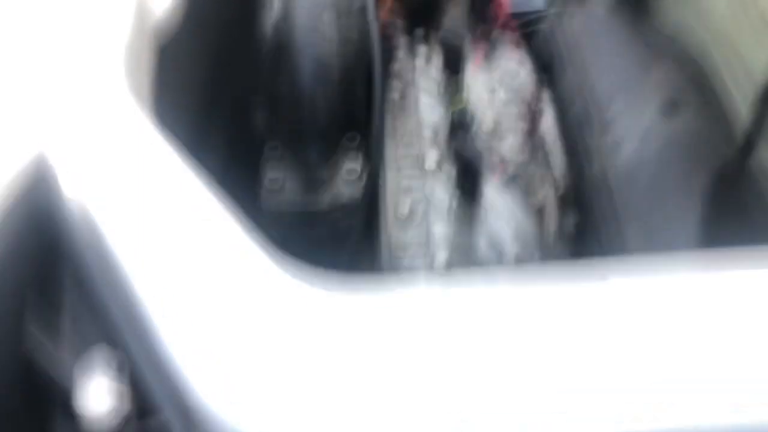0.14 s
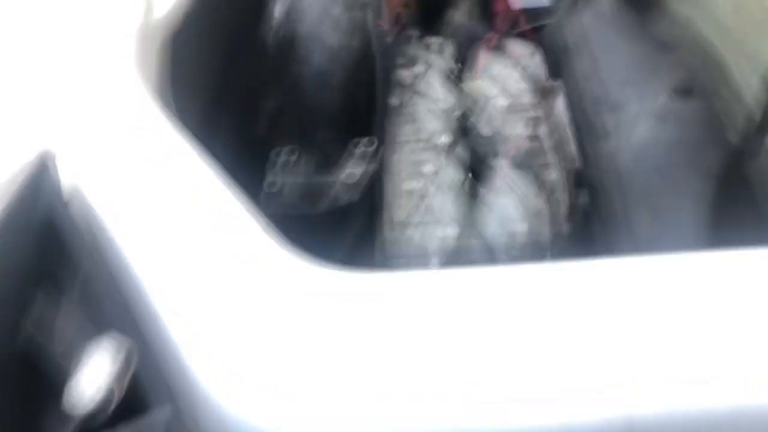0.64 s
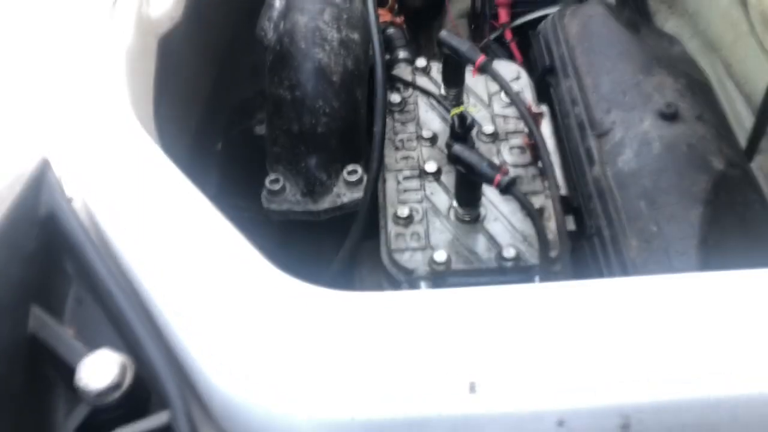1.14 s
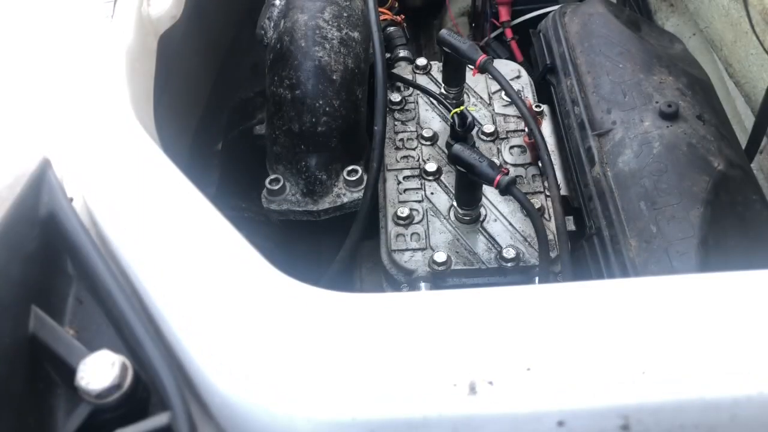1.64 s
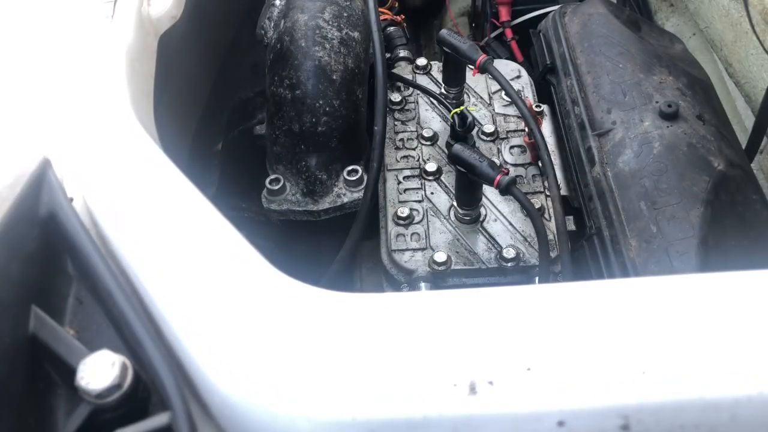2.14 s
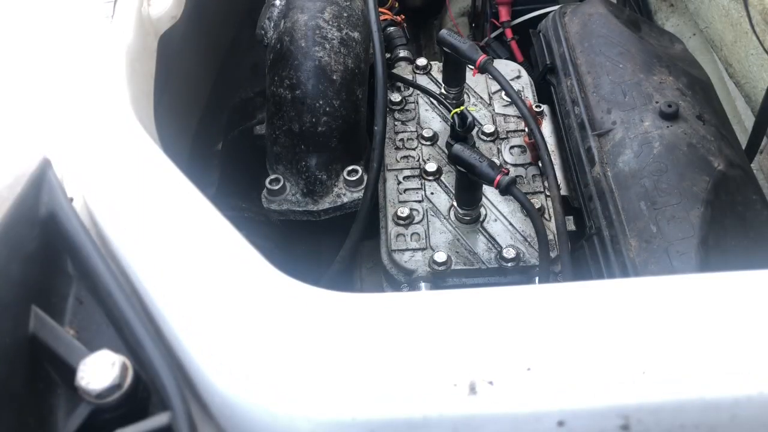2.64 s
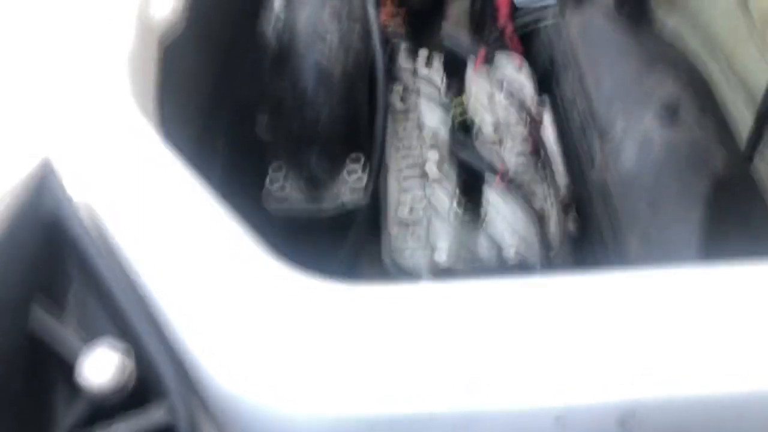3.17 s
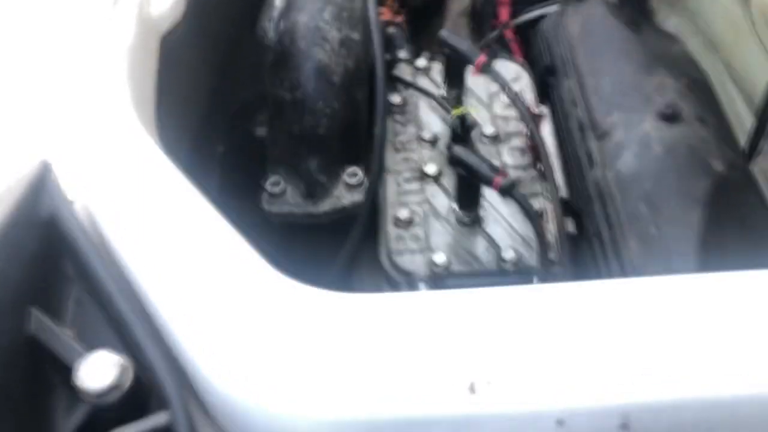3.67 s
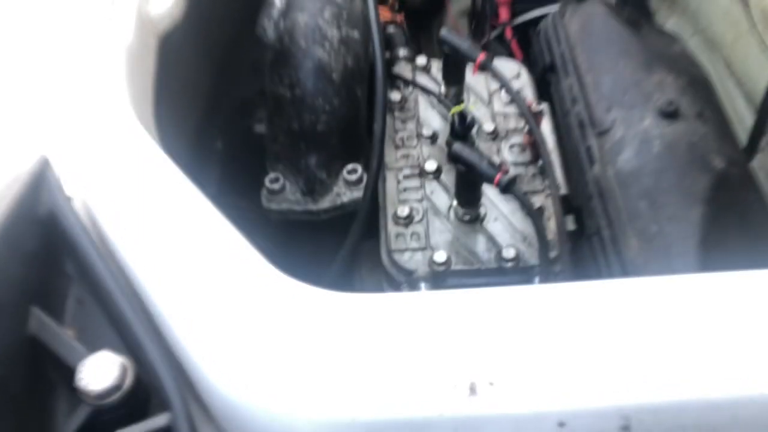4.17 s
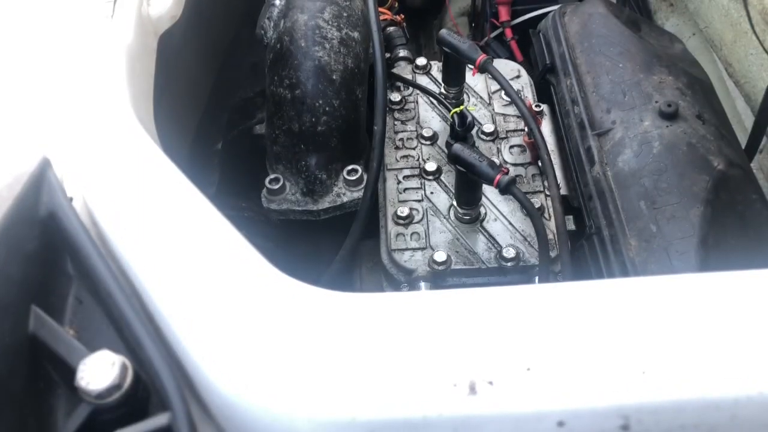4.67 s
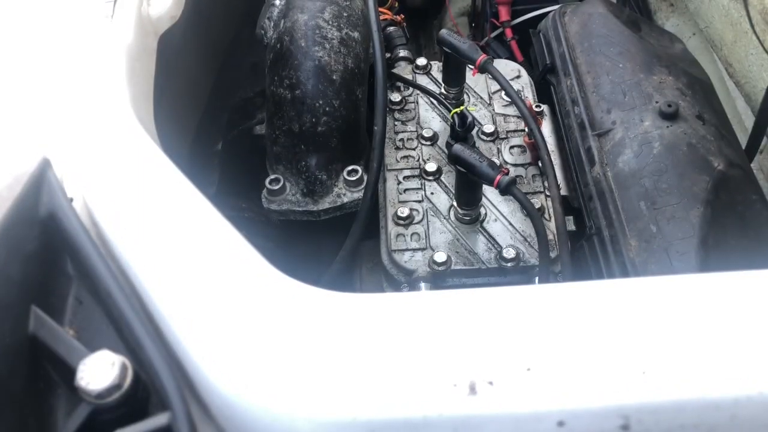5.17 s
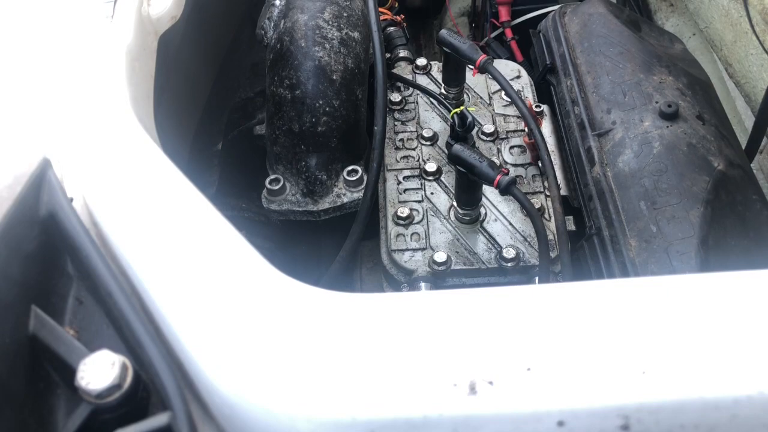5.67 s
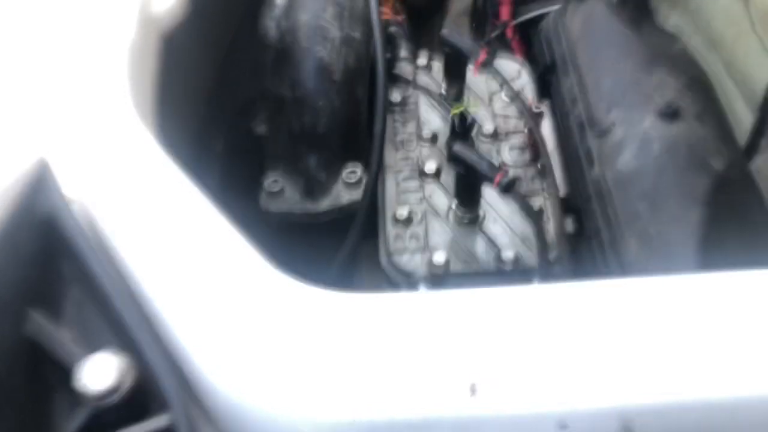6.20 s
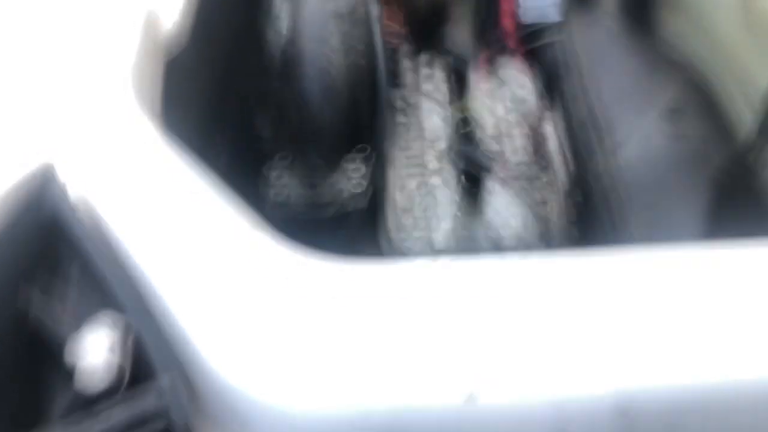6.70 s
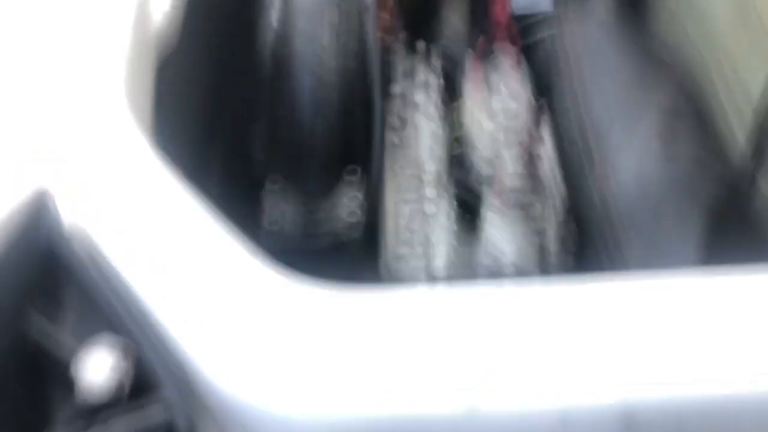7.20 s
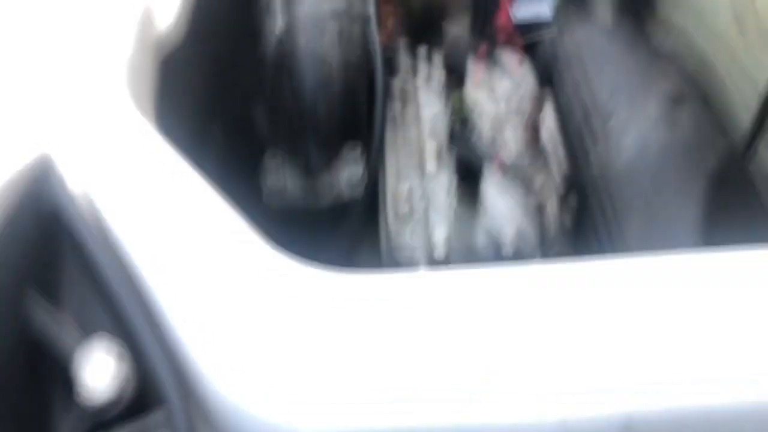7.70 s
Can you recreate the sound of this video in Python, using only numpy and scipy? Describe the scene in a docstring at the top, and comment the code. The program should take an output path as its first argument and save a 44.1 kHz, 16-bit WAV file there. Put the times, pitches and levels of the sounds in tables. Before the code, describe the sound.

A phone-like microphone just over the engine bay hears a two-cylinder engine buzzing unevenly, slowing into hissing, metallic rattles and stopping. After calm air and low wind thumps, the starter bites with a loud double clack and churns in rhythmic pulses, stops, snaps in again for a moment, then spins down. Small ticks, thin hiss and a barely audible bird fill the gap before a final, stronger crank. Short hollow hull echo throughout.

```python
"""Rough two-stroke and a starter in vain

A two-cylinder two-stroke in an open hull, heard by a phone held just above it, runs rough and dies; the starter
then cranks it three times in vain. Each layer is noise or tone timed by the crank angle and rung through resonances:
throb in the hull, gear rattle, port hiss twice a turn. Solenoid and pinion clack as filtered noise bursts.
Around them: ticks, wind bumps, breathy swells of noise, a faint hiss, a far bird's near-sine notes and open air."""
import sys
import numpy as np
from scipy import signal
from scipy.fft import rfft, irfft
from scipy.io import wavfile
from scipy.ndimage import uniform_filter1d

SR = 44100
rng = np.random.default_rng(int(sys.argv[2]) if len(sys.argv) > 2 else 0)


def persist_wave(psi):
    """Save psi, clipped to +-1, as 16-bit WAV."""
    counts = np.round(np.clip(psi, -1, 1) * 32767).astype(np.int16)
    wavfile.write(sys.argv[1], SR, np.atleast_2d(counts).T)


def gain_from_decibels(decibels):
    """Convert decibel values to linear amplitude factors."""
    exponent = np.asarray(decibels, float) / 20
    return 10 ** exponent


N = 345303
T = np.arange(N) / SR

# quiet open air, spectrum: hz, density_db_per_hz
AIR_SPECTRUM = [(30, -6), (70, -1), (200, 0), (300, -4), (480, -14), (1500, -26), (2200, -33), (4000, -40),
                (16000, -54)]
AIR_DB = -50.5
# the far bird's thin notes on one pitch: centre_s, half_length_s, level_db
BIRD_NOTES = [(5.714, .045, -66), (5.797, 0.013, -60), (5.89, .03, -82), (5.98, .035, -78.5)]
BIRD_HZ = 4510
# its falling note: time_s, pitch_hz, level_db
BIRD_FALL = [(5.945, 3770, -83), (5.97, 3500, -76.5), (6.01, 3240, -73), (6.05, 3100, -67)]
# wind bumps on the microphone: start_s, level_db, pitch_hz
WIND_BUMPS = [(1.689, -46, 156), (1.834, -36, 127), (2.132, -40, 74.5), (2.179, -40, 45.8),
              (2.233, -34, 62.3), (2.319, -39.5, 70.4), (2.359, -44.5, 42.6), (2.459, -46, 57),
              (5.776, -42, 78)]
# soft breathy swells of noise: rustles, and the last high hiss as the starter coasts:
# centre_s, half_length_s, level_db, centre_hz
BREATHY_SWELLS = [(1.678, 0.0065, -66, 2470), (1.832, 0.0173, -72.5, 10900), (2.03, 0.051, -71.5, 6920),
                  (2.267, 0.02, -68, 3600), (2.308, 0.15, -69, 1700), (4.422, .13, -67, 8970),
                  (4.712, 0.044, -72, 10000), (5.021, 0.04, -72, 9100), (5.271, .05, -73, 9000)]
# a faint hiss, perhaps gas seeping from a cylinder, resonances: hz, width_hz, gain_db
SEEP_MODES = [(2884, 130, 5), (4570, 493, -4.5), (5500, 900, -9.5), (8000, 2800, -21)]
SEEP_S, SEEP_HOLD_S, SEEP_DB, SEEP_FALL_DB_S = 4.83, 0.3, -67, 22
# small ticks round the hull: start_s, peak_db, crack_hz, t60_s, crankcase_share_db
TICKS = [(.998, -28, 8000, 0.013, -20), (1.023, -36, 9000, 0.015, -23), (1.149, -40, 4000, .05, 4),
         (1.194, -37, 1000, 0.035, 16), (4.658, -39, 2160, 0.033, 3), (4.868, -30.5, 2090, 0.076, 7.5),
         (5.172, -44, 3100, 0.026, -10), (5.203, -54, 6050, .02, -6), (5.234, -47, 3280, 0.052, 9)]
# solenoid and pinion: start_s, peak_db, crack_hz, t60_s, crankcase_share_db
CLACKS = [(2.7205, -9.5, 2440, 0.18, 0.5), (2.743, -0.5, 3950, 0.13, 3.5), (3.658, -0.5, 1908, 0.09, -11),
          (3.8395, -8, 2370, 0.2, 2), (3.858, -0.5, 3630, 0.17, 8), (3.884, -18, 1947, 0.034, -9),
          (3.972, -14.5, 2200, 0.2, 5.5), (4.134, -2, 2640, 0.097, 0), (4.15, -11, 1900, .05, 4.5),
          (4.188, -20, 1276, 0.15, 7), (4.21, -28, 1960, 0.084, 4.5), (6.054, -8.5, 2460, 0.23, -1.5),
          (6.075, 1.5, 3780, 0.024, 4), (7.714, 0, 2770, 0.08, -1)]
BRIGHTER_DB_PER_DB = 2.24  # harder blows carry more treble
# sliding tones as the freed starter and the crank come to rest:
# centre_s, half_length_s, pitch_hz, slide_hz_per_s, level_db
REST_SLIDES = [(4.37, .06, 720, -1500, -46), (4.77, .02, 2050, -2500, -58), (4.845, .02, 3100, -5000, -59)]
# the starter whines as it first takes the load: centre_s, half_length_s, base_hz, level_db
STARTER_WHINES = [(2.887, .028, 570, -35), (6.217, 0.02, 590, -31)]

# one curve per spell of turning: time_s, shaft_turns_hz, hull_throb_db, drive_db (0 = full drive)
SPELLS = [
    [(0.0, 35.53, -15, -0.5), (0.5, 36.11, -16, -0.5), (0.634, 32.56, -17.5, -2), (0.722, 30.23, -15.5, -3),
     (0.78, 29.62, -23, -6), (0.944, 30.73, -24, -11.5), (1.052, 28.1, -26.5, -13.5),
     (1.164, 25.4, -37.5, -22), (1.278, 25.4, -41.5, -38), (1.5, 23.37, -57, -48)],
    [(2.75, 13.5, -34, -16.5), (2.804, 16, -32.5, -12), (2.97, 16, -20.5, -0.5), (3.15, 17.4, -21.5, -0.5),
     (3.458, 17.6, -23, 0), (3.682, 17.8, -21, 0.2), (3.74, 16, -26, -18), (3.838, 16.8, -27.5, -16)],
    [(3.865, 62, -37.5, -6.5), (3.913, 17.5, -27, -12.5), (4.121, 18, -24.5, -12), (4.177, 21, -42.5, -24),
     (4.23, 16, -41.5, -28), (4.417, 21, -55, -32.5), (4.6, 16, -51, -44), (4.85, 14.0, -54, -53)],
    [(6.08, 12.7, -23, -12), (6.152, 17.5, -27.5, -9), (6.284, 17.3, -17, -1), (6.46, 18.1, -17, -1.1),
     (6.668, 18.6, -14, 0), (7.258, 18.35, -14, 0.5), (7.604, 18.4, -14, 0.4), (7.732, 18, -16, -0.8),
     (7.756, 18.1, -16, -6), (7.83, 12, -32, -15)],
]
# per spell: time of one strong port puff puff_s, throb's swell per turn 0-1, puff depth 0-1
MANNER = [(.205, 0.03, 0.6), (3.305, 0.75, 0.98), (3.97, .3, 0.7), (7.207, 0.2, 0.87)]
# per spell: pure share of the throb 0-1, stroke scatter_db, pinion thrown out out_s (negative = no starter)
EVENNESS = [(.05, 4, -1), (.85, 1.5, 3.659), (.1, 4, 4.134), (.91, 1.2, 7.714)]
# exhaust growl, crankcase, metal rattle, port hiss follow the drive: full_drive_db, slope_db_per_db
RUNNING_LAW = [(-16.5, 1.32), (-15.5, 1.76), (-27, 1.45), (-28.5, 1.72)]
CRANKING_LAW = [(-25, 0.95), (-19, 1), (-25, 0.85), (-28, 1.05)]  # same rows and columns with the starter turning it
# the pinion biting jolts the same four layers: peak_db, fall_db_per_s
JOLT = [(-16.5, 109.5), (-15, 145.5), (-16, 334.5), (-21, 423.5)]
# per spell: strength_db of the jolt at its start, and when the pinion is thrown out
BITE_DB = [-70, -1, -2, 2]
THROW_DB = [-60, -10.5, -12.5, -12]
# short surges: they lift the hiss, and the rattle where the gears run free;
# growl and crankcase too while the engine runs: centre_s, hiss_boost_db
SURGES = [(.05, 10), (0.223, 9), (.355, 4.5), (.53, 5.5), (0.661, 6.5), (.76, 11), (.825, 9.5),
          (.885, 11.5), (1.0, 10.5), (1.085, 4), (1.15, 5.5), (1.2, 6.5), (3.97, 7), (4.085, 4),
          (4.203, 5.5)]
# running engine's firing orders: shaft_order, level_db
FIRING_ORDERS = [(1, -11), (2, -1), (3, 0), (4, -9), (6, -3), (9, -6)]
# hull resonances: hz, width_hz, gain_db
HULL_MODES = [(55, 3.9, 4.5), (73, 11, -2.1), (97, 42, -6)]
# exhaust resonances: hz, width_hz, gain_db
PIPE_MODES = [(149, 42, -5), (223.7, 12, 2.2), (244.5, 26, -5), (323.7, 28, -0.5), (376.2, 31, 1),
              (417, 144, -6)]
# crankcase resonances: hz, width_hz, gain_db
CASE_MODES = [(497.4, 60, -4.5), (580, 70, -1), (645, 36, 5), (695, 35, 2), (812, 52, -6), (877, 28, -0.5),
              (940, 40, -2.5)]
# gear rattle, spectrum: hz, density_db_per_hz
RATTLE_SPECTRUM = [(600, -35), (1050, 1.5), (1420, -7), (1560, -13.5), (1750, -5.5), (2600, 0),
                   (3950, -3.5), (4150, -14), (6000, -32.5), (9000, -56.5)]
# pinion in the ring gear, resonances: hz, width_hz, gain_db
MESH_MODES = [(1300, 88, 0.5), (1430, 21, 9.5), (1702, 40, 5), (1890, 43, 8), (2156, 18, 3.5),
              (2346, 40, 0.5), (2550, 47, 2.5), (2997, 15, 2.5), (3400, 45, 6), (3780, 41, -5.5),
              (3950, 19, -4.5), (4190, 18, -8.5)]
# free flywheel and casting, resonances: hz, width_hz, gain_db
CASTING_MODES = [(1190, 60, -11), (1690, 40, -8), (1885, 38, 3), (2190, 50, -9), (2575, 40, -3),
                 (2820, 60, -4), (3010, 45, -3), (3900, 80, -11), (4950, 110, -19), (5820, 70, -18),
                 (6360, 60, -16), (7760, 100, -17), (8980, 110, -19), (9700, 150, -23), (11600, 150, -22),
                 (12280, 70, -19), (14100, 90, -22), (14440, 90, -21)]
CHIME_RUNNING_DB, CHIME_COASTING_DB = 6.5, -9.5  # ring of the casting once nothing drives the ring gear
# port hiss, spectrum: hz, density_db_per_hz
HISS_SPECTRUM = [(2350, -4.5), (4000, -3), (5390, -4.5), (6280, -1.5), (7100, -2.5), (9180, -2.5),
                 (12500, -7.5), (16200, -5)]
COAST_HISS_DB = -2.5  # the freed starter spins on and hisses


def level(x, db):
    """Set the rms."""
    return x * gain_from_decibels(db) / np.sqrt(np.mean(x ** 2))


def colour(x, points):
    """Causal filter through (Hz, dB) points, from the folded cepstrum of the log gain."""
    hz, db = np.transpose(points)
    grid = np.fft.rfftfreq(4096, 1 / SR)
    cepstrum = irfft(np.interp(np.log(grid + 1), np.log(hz), db) * np.log(10) / 20)
    cepstrum[1:2048] *= 2
    cepstrum[2049:] = 0
    response = irfft(np.exp(rfft(cepstrum)))
    return signal.fftconvolve(x, response)[:len(x)]


def ring(x, modes):
    """Sum of two-pole resonances with alternating sign."""
    out = 0
    for k, (hz, width, db) in enumerate(modes):
        out = out + (-1) ** k * gain_from_decibels(db) * signal.lfilter(*signal.iirpeak(hz, hz / width, SR), x)
    return out


def walk(rate):
    """Random levels held 1 / rate s and slewed twice; spread near 1."""
    k = int(SR / rate)
    held = np.repeat(rng.standard_normal(N // k + 1), k)
    return 1.3 * uniform_filter1d(uniform_filter1d(held, k), k)[:N]


def waver(spread_db, rate, n=N):
    """Gain that wanders at random by about spread_db."""
    return gain_from_decibels(spread_db * walk(rate)[:n])


def shimmer(shape, modes, flicker_db):
    """Resonances on unrelated noises; each swells and fades on its own."""
    n = len(shape)
    return sum(ring(shape * rng.standard_normal(n) * waver(flicker_db, 22, n), [mode]) for mode in modes)


def bell(centre_s, half_s):
    """Smooth swell, down to 1/e at half_s either side of its centre."""
    return np.exp(-((T - centre_s) / half_s) ** 2)


def air():
    """Quiet open air: noise whose bass is gusty while the rest drifts slowly."""
    gusty = colour(rng.standard_normal(N) * waver(1.2, 16), AIR_SPECTRUM)
    drifting = colour(rng.standard_normal(N) * waver(0.71, 2.6), AIR_SPECTRUM)
    split = signal.butter(2, 320, fs=SR)
    # gusty below the split, drifting above it
    return level(signal.filtfilt(*split, gusty - drifting) + drifting, AIR_DB)


def bird():
    """Thin whistles, near sines: swelling notes on one pitch, then a falling one."""
    notes = sum(gain_from_decibels(db) * bell(s, half) for s, half, db in BIRD_NOTES)
    s, hz, db = np.transpose(BIRD_FALL)
    phase = 2 * np.pi * np.cumsum(np.interp(T, s, hz)) / SR
    falling = np.sin(phase) * gain_from_decibels(np.interp(T, s, db, -140, -140))
    return np.sqrt(2) * (notes * np.sin(2 * np.pi * BIRD_HZ * T) + falling)


def bumps():
    """A gust presses the microphone: a cycle or two of low pressure."""
    out, t = np.zeros(N), T[:SR // 8]
    for s, db, hz in WIND_BUMPS:
        press = np.sin(2 * np.pi * hz * t) * np.exp(-t * hz / 0.79)
        out[int(s * SR):][:len(t)] += gain_from_decibels(db) * 2.35 * press
    return out


def breathy_swells():
    """Short swells of grainy, broad noise."""
    out, t = np.zeros(N), T[:SR // 2]
    middle = t.mean()
    for s, half, db, hz in BREATHY_SWELLS:
        grain = colour(rng.standard_normal(len(t)), [(hz / 3.6, -18), (hz, 0), (hz * 3.3, -16)])
        swell = np.exp(-((t - middle) / half) ** 2)
        out[int((s - middle) * SR):][:len(t)] += level(grain, db) * swell
    return out


def seep():
    """Resonant noise that starts at once, holds and fades."""
    onset = np.clip((T - SEEP_S) / 0.012, 0, 1)
    fade = gain_from_decibels(-SEEP_FALL_DB_S * np.maximum(T - SEEP_S - SEEP_HOLD_S, 0))
    return onset * fade * level(ring(rng.standard_normal(N) * waver(0.98, 36), SEEP_MODES), SEEP_DB)


def blows(rows, ring_db, top_db, spread):
    """A sharp crack, then a burst of chatter that rings casting and crankcase."""
    out, t = np.zeros(N), T[:SR // 3]
    for s, db, hz, t60, case_db in rows:
        fall = np.exp(-np.log(1000) * t / max(t60, .01))
        burst = rng.standard_normal(len(t)) * fall * np.minimum(t / 0.0014, 1)
        treble_db = top_db + BRIGHTER_DB_PER_DB * db
        skirt_hz = min(hz * spread ** 2, 15000)
        crack = colour(burst * fall, [(300, -25), (hz / spread, -8), (hz, 0), (skirt_hz, -10), (16000, treble_db)])
        casting = level(ring(burst, CASTING_MODES[:-5]), ring_db)
        crankcase = level(ring(burst, CASE_MODES + PIPE_MODES[-3:]), case_db)
        hit = level(crack, 0) + casting + crankcase
        out[int(s * SR):][:len(t)] += (hit * gain_from_decibels(db) / np.abs(hit).max())[:N - int(s * SR)]
    return out


def slides():
    """Short rough tones that sag in pitch."""
    out = 0
    for s, half, hz, slide, db in REST_SLIDES:
        pitch = (hz + slide * np.clip(T - s, -3 * half, 3 * half)) * (1 + .02 * walk(300))
        tone = np.sin(2 * np.pi * np.cumsum(pitch) / SR)
        out = out + gain_from_decibels(db) * waver(3.5, 90) * bell(s, half) * tone
    return out


def whine():
    """Three rough overtones of the armature, sliding up as it gathers speed."""
    out = 0
    for s, half, hz, db in STARTER_WHINES:
        slide = 1 + np.clip(T - s, -.1, .1) + 0.019 * walk(150)
        phase = 2 * np.pi * np.cumsum(hz * slide) / SR
        tones = sum(gain_from_decibels(-2.9 * (k - 4)) * waver(4.6, 90) * np.sin(k * phase) for k in range(2, 5))
        out = out + gain_from_decibels(db) * bell(s, half) * tones
    return out


def drive_levels(t, drive_db, law, jolts):
    """Levels in dB of growl, crankcase, rattle and hiss: each follows the drive, and dying jolts add their power."""
    out = []
    for (full_db, slope), (peak_db, fall) in zip(law, JOLT):
        power = gain_from_decibels(full_db + slope * drive_db) ** 2
        for at, db in jolts:
            power = power + (t >= at) * gain_from_decibels(peak_db + db - fall * np.abs(t - at)) ** 2
        out.append(10 * np.log10(power))
    return out


def port_puffs(angle, strong_luck, weak_luck, depth):
    """The ports open quickly twice a turn, the weaker a third of a turn ahead of the stronger."""
    strong = gain_from_decibels(.9 * strong_luck) * np.exp(-angle / .42)
    weak = gain_from_decibels(1.5 * weak_luck - 1.2) * np.exp(-((angle - .67) % 1) / .35)
    return uniform_filter1d(depth * np.maximum(strong, weak) + (1 - depth) * .7, SR // 250)


def cranked_throb(a, strokes, noise, swell, pure):
    """The fourth order sits on the hull resonance; the crank slowing at compression bends and swells it."""
    tone = (1 + swell * np.cos(a + 1.2)) * np.sin(4 * a + (.5 + .25 * swell) * np.sin(a + .4))
    knock = level(ring(strokes + 0.99 * noise, HULL_MODES), 0)
    return np.sqrt(pure) * level(tone, 0) + np.sqrt(1 - pure) * knock


def running_throb(a, noise):
    """The engine's own firing orders waver over the hull noise."""
    orders = sum(gain_from_decibels(db) * waver(4, 21.56, len(a)) * np.sin(k * a + k ** 2) for k, db in FIRING_ORDERS)
    # every second turn fires harder
    orders = orders * (1 + .7 * np.cos(a / 2 - 3.9))
    return level(level(orders, 1.1) + level(ring(noise, HULL_MODES[1:]), -0.31), 0)


def exhaust_growl(strokes, puffs, noise, pure):
    """Dull stroke thuds and puffing noise ring the exhaust."""
    thuds = colour(strokes, [(60, -12), (130, 0), (210, -2), (300, -14)])
    return ring(pure * thuds + noise * puffs ** 0.67, PIPE_MODES)


def crankcase(puffs, running):
    """Noise that follows the puffs weakly rings the crankcase."""
    case = shimmer(puffs ** .25 * waver(1.5, 150, len(puffs)), CASE_MODES, 1.5)
    if running:  # with the engine running by itself the upper pair is weaker
        case = colour(case, [(700, -1), (900, -6), (1100, -2)])
    return case


def gear_rattle(puffs, noise, slack_knock, free, surge):
    """Dense uneven blows, harder under each stroke; the spectrum alters once the pinion is out."""
    teeth = noise * waver(2.8, 500, len(puffs)) * puffs ** .5 * slack_knock
    meshed = level(colour(teeth, RATTLE_SPECTRUM), -4) + level(ring(teeth, MESH_MODES), -2)
    loose = colour(teeth, [(700, -27), (1200, 7.5), (3000, 0.5), (5500, -8), (9000, -34)])
    return (1 - free) * level(meshed, 0) + free * surge ** 0.25 * level(loose, -4.5)


def casting_chime(puffs, free, rattle_db, running):
    """The free casting keeps ringing and stands out more as the blows weaken."""
    chime_db = CHIME_RUNNING_DB if running else CHIME_COASTING_DB
    return shimmer(free * puffs * gain_from_decibels(chime_db + 0.6 * rattle_db), CASTING_MODES, 1.5)


def port_hiss(puffs, noise, free, surge, running):
    """Puffing noise with a shimmer of the casting's upper modes."""
    jet = noise * puffs * waver(1, 300, len(puffs))
    bright = level(colour(jet, HISS_SPECTRUM), 0) + level(shimmer(puffs, CASTING_MODES[-10:], 2.5), -7.5)
    # without the starter's whirr the hiss is duller
    dull = level(colour(bright, [(4000, 6), (7000, 0.7), (16000, -6.5)]), -2.5 if running else COAST_HISS_DB)
    return surge * ((1 - free) * level(bright, 0) + free * dull)


def spell(rows, manner, even, bite_db, throw_db):
    """One spell of turning: every layer is timed by the crank angle."""
    puff_s, swell, depth = manner
    pure, scatter_db, out_s = even
    s, *columns = np.transpose(rows)
    t = T[int(s[0] * SR):int(s[-1] * SR)]
    hz, throb_db, drive_db = (np.interp(t, s, c) for c in columns)
    running = out_s < s[0]
    law = RUNNING_LAW if running else CRANKING_LAW
    levels_db = [throb_db] + drive_levels(t, drive_db, law, [(s[0], bite_db), (out_s, throw_db)])

    turns = np.cumsum(hz) / SR
    # uneven firing hurries and holds back the crank
    turns = turns + .06 * (1 - pure) * walk(25)[:len(t)]
    turns = turns - np.interp(puff_s, t, turns)
    whole = np.maximum.accumulate(np.floor(turns)).astype(int)
    angle, a = turns % 1, 2 * np.pi * turns  # in turns, in radians
    luck = rng.standard_normal((80, 4))[whole - whole[0]].T  # drawn afresh each turn
    noise = rng.standard_normal((4, len(t)))
    strokes = level(np.diff(whole, prepend=whole[0]) * gain_from_decibels(scatter_db * luck[0]), 0)
    if not running:  # the puffs die away as the released crank stops
        depth = depth * np.exp(-np.maximum(t - out_s, 0) / .1)
    puffs = port_puffs(angle, luck[1], luck[2], depth)
    surge = gain_from_decibels(sum(db * np.exp(-((t - at) / 0.026) ** 2) for at, db in SURGES))
    free = np.clip((t - out_s) / .005, 0, 1)  # 1 once the pinion is out
    # the gears take up their slack with a knock at each stroke
    slack_knock = 1 + 1.3 * pure * (t < out_s) * gain_from_decibels(4 * luck[3]) * np.exp(-angle / .07)

    throb = running_throb(a, noise[0]) if running else cranked_throb(a, strokes, noise[0], swell, pure)
    growl = exhaust_growl(strokes, puffs, noise[1], pure)
    case = crankcase(puffs, running)
    if running:
        growl, case = growl * surge ** 0.45, case * surge ** 0.41
    rattle = gear_rattle(puffs, noise[2], slack_knock, free, surge)
    chime = casting_chime(puffs, free, levels_db[3], running)
    hiss = port_hiss(puffs, noise[3], free, surge, running)

    layers = zip([throb, level(growl, 0), level(case, 0), rattle, hiss], levels_db)
    mix = chime + sum(x * gain_from_decibels(db) for x, db in layers)
    # 10 ms fades, but a spell that starts at 0 s is already under way
    fade = np.clip(np.minimum(t - t[0] + (s[0] == 0), t[-1] - t) / .01, 0, 1)
    out = np.zeros(N)
    out[int(s[0] * SR):][:len(t)] = fade * mix
    return out


def hull_echo(near):
    """A short noise tail: the open hull's brief echo."""
    t = T[:SR // 2]
    tail = rng.standard_normal(len(t)) * np.exp(-np.log(1000) * t / 0.55)  # t60 0.55 s
    return signal.fftconvolve(near, tail / np.sqrt(np.sum(tail ** 2)))[:N]


def scene():
    """Engine, starter and blows echo inside the hull; the surroundings stay dry."""
    around = air() + bird() + bumps() + breathy_swells() + seep()
    near = blows(TICKS, -3.5, -8.5, 1.6) + blows(CLACKS, -3.4, -24.5, 1.1) + slides() + whine()
    near = near + sum(map(spell, SPELLS, MANNER, EVENNESS, BITE_DB, THROW_DB))
    return (around + near + gain_from_decibels(-14) * hull_echo(near))[None]


def low_pass(x):
    """Removes everything above the highest recorded frequency."""
    return signal.sosfilt(signal.butter(12, 15800, fs=SR, output="sos"), x)


def record(dry):
    """The phone cuts the deepest bass and rounds the loudest peaks."""
    thinned = signal.lfilter(*signal.butter(2, 42, "high", fs=SR), dry)
    mix = np.tanh(0.83 * thinned) / 0.77
    return low_pass(mix)


dry = scene()
out = record(dry)
persist_wave(out)
```